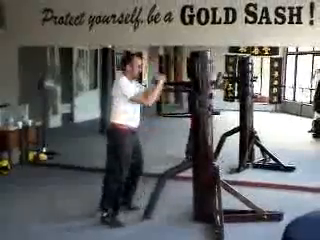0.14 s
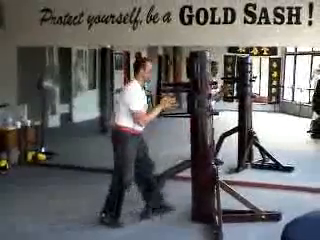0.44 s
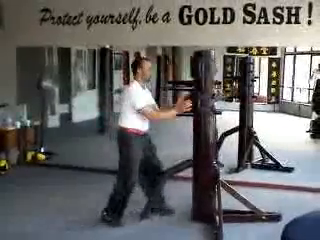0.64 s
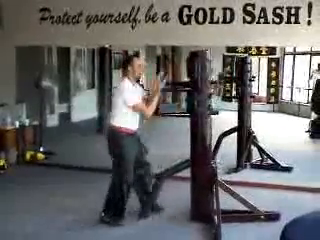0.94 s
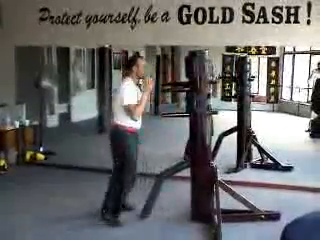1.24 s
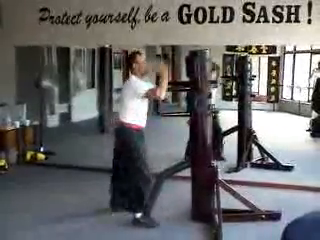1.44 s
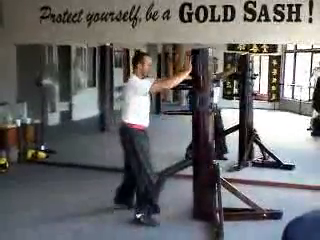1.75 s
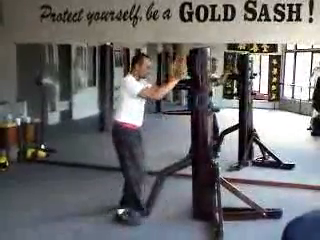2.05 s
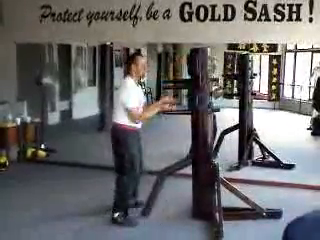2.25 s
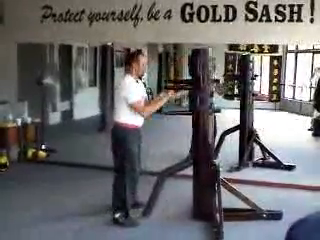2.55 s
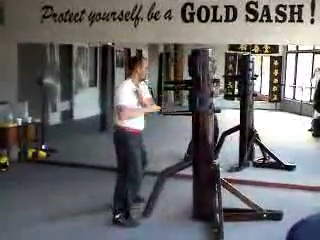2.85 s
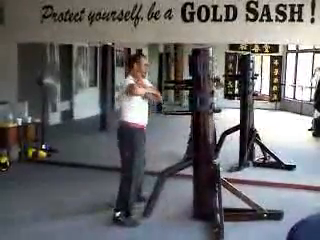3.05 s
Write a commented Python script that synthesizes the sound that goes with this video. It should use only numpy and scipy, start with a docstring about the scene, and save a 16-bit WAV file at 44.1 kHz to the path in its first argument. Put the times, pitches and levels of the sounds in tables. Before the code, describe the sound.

Wooden training dummy struck by forearms and palms in a reverberant hall. Sharp, slapping woody cracks land near 0.14, 0.6, 1.1, 1.6, 2.0 and 2.46 seconds, with brief arm rattle. The blows at 0.6 and 1.6 are duller, with low palm thumps. Hollow knocks follow around 0.7-0.87, 1.1 and 2.74. An overloaded microphone flattens the hits; echo and steady hiss swell back.

```python
"""Six blows of forearms and palms on a wooden training dummy, about half a second apart, in a hard-walled hall.
Hand and sleeve brush the wood, then skin slaps and cracks, a loose arm rattles and the wood's modes ring.
On the second and fourth blows a palm adds a low thump and sway; hollow knocks follow some of the blows.
Close reflections come first, then a hall tail dies band by band, longest in the bass.
The overloaded recorder's limiter flattens each blow, then lets the hall and the steady room hiss swell back."""
import sys
import numpy as np
from scipy import signal
from scipy.fft import rfft, irfft
from scipy.io import wavfile

SR = 44100
rng = np.random.default_rng(int(sys.argv[2]) if len(sys.argv) > 2 else 0)


def unload_wav(signal):
    """Save mono or channel-first audio to the path in sys.argv[1] as 16-bit WAV at rate SR, clipped to [-1, 1]."""
    wavfile.write(
        sys.argv[1],
        SR,
        np.round(np.clip(np.atleast_2d(signal).T, -1, 1) * 32767).astype(np.int16),
    )


N = 141120
T = np.arange(N) / SR
HZ = np.maximum(np.fft.rfftfreq(N, 1 / SR), 1)


def from_db(db):
    """Decibels to gain."""
    return 10 ** (np.asarray(db) / 20)


def at_hz(points, hz):
    """Read a (frequency, value) table on a log-frequency axis."""
    f, v = np.transpose(points)
    return np.interp(np.log(hz), np.log(f), v)


def dying(t60):
    """Exponential decay that falls 60 dB in t60 seconds."""
    return np.exp(-np.log(1000) * T / t60)


def rising(seconds):
    """Exponential approach to full level with this time constant."""
    return 1 - np.exp(-T / seconds)


def convolve(x, response):
    """Play x through a response."""
    return signal.fftconvolve(x, response, axes=-1)[..., :N]


def shaped(x, spectrum):
    """Filter by a smooth spectrum."""
    return irfft(rfft(x) * from_db(at_hz(spectrum, HZ)), N)


def coloured(x, spectrum):
    """Give noise a spectrum and bring it to rms 1."""
    y = shaped(x, spectrum)
    return y / y.std()


def clicks(times, sizes):
    """A train of single-sample clicks."""
    positions = (np.ravel(times) * SR).astype(int)
    return np.bincount(positions, np.ravel(sizes), N)[:N]


# Stereo width, side relative to mid: [f/Hz, level/dB]
STEREO_WIDTH = [(60, -24), (300, -20), (700, -9), (1400, -6.5), (2800, -3.5), (7000, -10)]


def diffuse_noise():
    """Stereo noise, alike in both channels in the bass and wider in the treble."""
    mid, side = rng.standard_normal((2, N))
    return mid + shaped(side, STEREO_WIDTH) * np.array([[1], [-1]])


# Blows: [t/s, level/dB, drive of thud, frame, hollow, knock, clack, ping, snap and click registers/dB,
#         skin slap relative to the blow level/dB]
BLOWS = [ (0.1402, 3.5, -25.5, -7.5, 8, -1, 4.5, 0.5, 5.5, -9.5, 0.5),
         (.6050, -9, 15, 7, 15, -3, -15, -18, -4.5, 2.5, -1),
         (1.0923, 5.5, -12.5, -7.5, 3.5, -1, 3, 3.5, 0.5, -8, -5.5),
         (1.5830, -8.5, 16.5, 7, 15, -2, -14.5, -5.5, -20, -17, 5.5),
         (2.005, -1, -8, 4, 3, 3, -1, 1.5, -3.5, -24, -1),
         (2.4630, 13.5, -26.5, -9.5, -5.5, -7.5, 6, -8, 7, -2.5, -10.5), ]
# Register centres, from thud to click: [f/Hz]
REGISTER_HZ = [100, 270, 570, 890, 1250, 1780, 2400, 3500]
# Light touches of hand and sleeve: [t/s, wood level/dB, slap level/dB]
TOUCHES = [(.1330, -19, -7.5), (0.635, -32.5, -12), (1.5724, -17, -13.5), (1.5925, -52, -27),
           (2.0010, -23, -9), (2.4565, -22.5, -13)]
# Ringing modes of the dummy: [f/Hz, level/dB, t60/s]
WOOD_MODES = [(83.7, -16, 0.21), (131.8, -15, 0.04), (165, -24, 0.13), (202, -15.5, 0.088),
              (276.9, -10, 0.13), (392, -11.5, 0.033), (482, -12.5, .06), (571, -6, 0.089), (705, 2, 0.02),
              (790, -12.5, 0.066), (839, -1, 0.076), (926, 1, 0.075), (1118, -6.5, 0.039),
              (1230.5, -3, 0.051), (1343, -5.5, 0.038), (1453, -1, 0.022), (1750, -5, .03), (1897, -8, .03),
              (2155, -13, 0.06), (2233, -13, 0.062), (2384, -10.5, 0.031), (2544, -13.5, 0.033),
              (2650, -12, 0.02), (3428, -5.5, 0.024), (3715, -9.5, 0.019), (4520, -11.5, 0.017)]
# The arm bounces in its socket after each blow
RATTLES, RATTLE_GAP_S = 3, 0.007  # the gap is scaled at random for each bounce
RATTLE_DB, RATTLE_LOSS_DB = -14, 5.5  # first bounce, and drop per further bounce


def wood():
    """Blows, arm bounces and light touches strike a bank of two-pole resonators, one per mode."""
    blows, touches = np.array(BLOWS), np.array(TOUCHES)
    gaps = RATTLE_GAP_S * rng.uniform(0.4752, 1.5, (len(blows), RATTLES))
    bounce_s = blows[:, :1] + np.cumsum(gaps, axis=1)
    bounce_gain = from_db(RATTLE_DB - RATTLE_LOSS_DB * np.arange(RATTLES))
    touch_force = clicks(touches[:, 0], from_db(touches[:, 1]))
    out = 0
    for k, (hz, db, t60) in enumerate(WOOD_MODES):
        drive_db = [row[1] + at_hz(list(zip(REGISTER_HZ, row[2:-1])), hz) for row in BLOWS]
        drive = from_db(drive_db)
        rattle = drive[:, None] * bounce_gain * rng.standard_normal(bounce_s.shape)
        force = clicks(blows[:, 0], drive) + clicks(bounce_s, rattle) + touch_force
        r = np.exp(-np.log(1000) / (t60 * SR))
        w = 2 * np.pi * hz / SR
        # the tiny offset keeps the filter clear of denormal numbers
        ring = signal.lfilter([0, np.sin(w)], [1, -2 * r * np.cos(w), r * r], force + 1e-18)
        out = out + (-1) ** k * from_db(db) * ring  # neighbouring modes alternate in polarity
    return out


# Slap spectrum: [f/Hz, level/dB per Hz]
SLAP_SPECTRUM = [(100, -7), (400, 3.5), (1000, 4), (2000, -4), (3000, -6), (4300, -6.5), (5500, -11),
                 (7500, -16.5), (9000, -32.5)]
SLAP_DB = 30


def skin():
    """Every contact of skin on wood is a click filtered to a short bright slap."""
    blow_slaps = [(row[0], row[1] + row[-1]) for row in BLOWS]
    touch_slaps = [(row[0], row[-1]) for row in TOUCHES]
    s, db = np.transpose(blow_slaps + touch_slaps)
    return shaped(clicks(s, from_db(db + SLAP_DB)), SLAP_SPECTRUM)


# Sharp cracks of contact, heard straight from the wood: [t/s, level/dB, centre f/Hz]
CRACKS = [(0.1398, -3, 1980), (0.148, -6, 5000), (0.156, -21, 5070), (0.606, -19, 3500), (0.631, -15, 3900),
          (1.093, -7, 1770), (1.123, 2, 1750), (1.573, -25.5, 1500), (1.58, -14.5, 3500),
          (1.5965, -14, 3560), (2.008, -4, 1860), (2.463, 2, 1710)]
CRACK_T60_S, CRACK_RISE_S, CRACK_WIDTH_OCT = 0.062, 0.00077, 0.41


def cracks():
    """Each crack is a rough noise burst around one pitch, gone in a few hundredths of a second."""
    noise, out = rfft(diffuse_noise()), 0
    shape = rising(CRACK_RISE_S) * dying(CRACK_T60_S)
    for s, db, hz in CRACKS:
        octaves_off = np.log2(HZ / hz)
        band = irfft(noise / (1 + (octaves_off / CRACK_WIDTH_OCT) ** 2), N)
        burst = np.interp(T - s, T, shape, left=0)
        out = out + from_db(db) * band / band.std() * burst
    return out


# The flat of the palm lands on the trunk: [t/s, level/dB]
PALM_THUMPS = [(0.604, -16), (1.578, -8)]
# Thump spectrum: [f/Hz, level/dB per Hz]
THUMP_SPECTRUM = [(40, -16.5), (70, 13.5), (100, 2), (150, -22.5), (350, 1), (550, 5), (1000, -28),
                  (3000, -43.5)]
THUMP_T60_S = 0.29


def thumps():
    """A palm shakes the whole stand: decaying noise makes a low, pitchless shudder."""
    s, db = np.transpose(PALM_THUMPS)
    envelope = convolve(clicks(s, from_db(db)), dying(THUMP_T60_S))
    return envelope * coloured(rng.standard_normal(N), THUMP_SPECTRUM)


SWAY_HZ, SWAY_SWELL_S, SWAY_T60_S, SWAY_DB = 90, 0.021, 0.065, 12  # level is relative to the thump


def sway():
    """A palm sets the heavy trunk bouncing on its stand for a few low cycles, carried through the floor."""
    s, db = np.transpose(PALM_THUMPS)
    shape = rising(SWAY_SWELL_S) * dying(SWAY_T60_S)
    return convolve(clicks(s, from_db(db + SWAY_DB)), shape * np.sin(2 * np.pi * SWAY_HZ * T))


# Short hollow knocks, close to the microphone: [t/s, level/dB, pitch f/Hz]
KNOCKS = [(.668, -23, 567), (.727, -12, 589), (.861, -17.5, 637), (.8715, -4, 558), (1.097, 2, 542),
          (1.108, -0.5, 540), (1.135, 3.5, 601), (2.738, -3, 623), (2.747, -12, 550)]
# Spectrum of the rough tick in each knock: [f/Hz, level/dB per Hz]
TICK_SPECTRUM = [(100, -20.5), (300, 3), (600, 0.5), (1300, -2.5), (2500, -15.5), (4500, -25.5),
                 (8000, -47)]
KNOCK_SWELL_S, KNOCK_T60_S = 0.014, 0.025
TICK_DB = -8.5  # relative to the knock


def knocks():
    """Dull sine knocks that swell for a few cycles and die at once, each with a little noisy tick."""
    s, db, pitch_hz = np.transpose(KNOCKS)
    shape = rising(KNOCK_SWELL_S) * dying(KNOCK_T60_S)
    shape = shape / shape.max()
    ring = 0
    for t, gain, hz in zip(s, from_db(db), pitch_hz):
        ring = ring + convolve(clicks([t], [gain]), shape * np.sin(2 * np.pi * hz * T))
    tick_envelope = convolve(clicks(s, from_db(db + TICK_DB)), shape)
    return ring + tick_envelope * coloured(rng.standard_normal(N), TICK_SPECTRUM)


# Hall decay: [f/Hz, t60/s]
HALL_T60 = [(80, 1.45), (250, 1.1), (550, 0.5), (1000, 1), (2300, 0.75), (4500, 0.67), (8000, 0.34)]
# Hall colour: [f/Hz, level/dB]
HALL_COLOUR = [(80, -10.5), (250, 4.5), (550, -0.5), (1000, 1), (2300, 3), (4500, -1), (8000, 1.5)]
EARLY_DB, EARLY_T60_S, EARLY_BUILD_S = -3, 0.12, 0.0027
HALL_DB, HALL_BUILD_S = 4.5, 0.053


def hall(x, direct_db):
    """Direct sound, close reflections from floor and mirror, and a long tail that dies band by band."""
    early = diffuse_noise() * dying(EARLY_T60_S) * rising(EARLY_BUILD_S)
    early = early / np.linalg.norm(early[0])
    noise, tail = rfft(diffuse_noise()), 0
    centres = np.geomspace(60, 9000, 12)
    for hz, share in zip(centres, np.eye(len(centres))):
        # triangular bands on a log-frequency axis
        band = irfft(noise * np.interp(np.log(HZ), np.log(centres), share), N)
        tail = tail + band * from_db(at_hz(HALL_COLOUR, hz)) * dying(at_hz(HALL_T60, hz))
    tail = tail * rising(HALL_BUILD_S) / np.linalg.norm(tail[0])
    response = from_db(EARLY_DB) * early + from_db(HALL_DB) * tail
    return from_db(direct_db) * x + convolve(x[None], response)


# Room hiss spectrum: [f/Hz, level/dB per Hz]
HISS_SPECTRUM = [(30, -6), (80, -0.5), (140, -4.5), (250, -0.5), (450, -13), (900, -11), (2000, -21.5),
                 (4000, -26.5), (5400, -31.5), (6500, -23), (7800, -47.5)]
HISS_DB = -33.5


def hiss():
    """Steady room hiss: diffuse stereo noise, darkened by its spectrum."""
    return from_db(HISS_DB) * coloured(diffuse_noise(), HISS_SPECTRUM)


BODY_DIRECT_DB, SLAP_DIRECT_DB, KNOCK_HALL_DB = -10, -7, -1.5


def scene():
    """Wood, thumps, knocks and slaps in the hall; knocks, cracks and sway also arrive without it, over hiss."""
    dull = knocks()
    body = hall(wood() + thumps() + from_db(KNOCK_HALL_DB) * dull, BODY_DIRECT_DB)
    slaps = hall(skin(), SLAP_DIRECT_DB)
    return body + slaps + dull + cracks() + sway() + hiss()


LIMIT_DB, SENSE_S, ATTACK_S = -3, 0.00078, 0.00052
RELEASE_DB_PER_S, SQUEEZE = 67.5, 0.85  # fall of the held overshoot; share of it taken off the level
CEILING, KNEE = 1.154, 2.94  # soft clip: full scale is 1; a higher knee bends more sharply
STOPBAND_HZ = 8700


def smooth(x, seconds):
    """One-pole smoothing with this time constant."""
    r = np.exp(-1 / (seconds * SR))
    return signal.lfilter([1 - r], [1, -r], x)


def record(dry):
    """A limiter ducks on each blow and recovers slowly; what slips past is soft-clipped; the top is cut."""
    power = smooth(np.mean(dry ** 2, axis=0), SENSE_S)
    over_db = np.maximum(10 * np.log10(power + 1e-12) - LIMIT_DB, 0)
    # a running maximum on a tilted axis holds each peak and lets it fall at a steady rate
    release_db = RELEASE_DB_PER_S * T
    held_db = np.maximum.accumulate(over_db + release_db) - release_db
    x = dry * from_db(-SQUEEZE * smooth(held_db, ATTACK_S))
    x = x / (1 + np.abs(x / CEILING) ** KNEE) ** (1 / KNEE)
    top_cut = signal.cheby2(14, 50, STOPBAND_HZ, fs=SR, output="sos")  # order 14, 50 dB down
    return signal.sosfilt(top_cut, x)


dry = scene()
out = record(dry)
unload_wav(out)
```